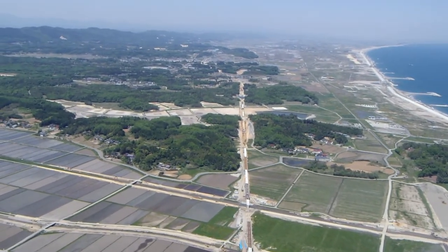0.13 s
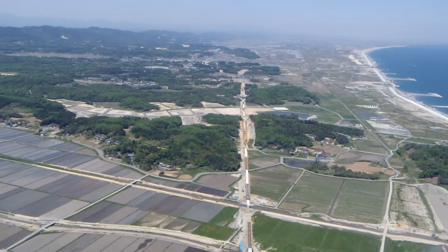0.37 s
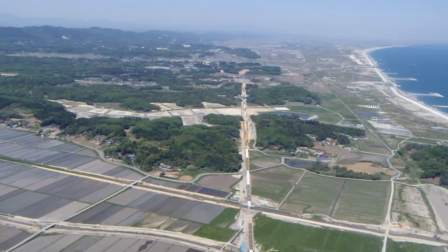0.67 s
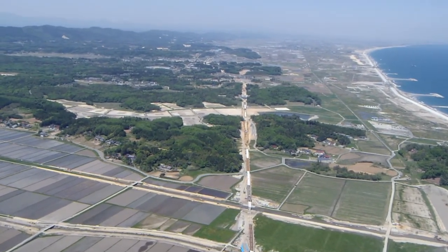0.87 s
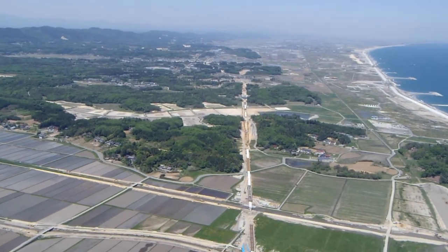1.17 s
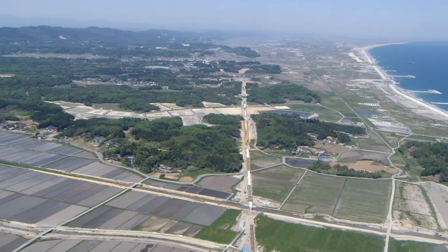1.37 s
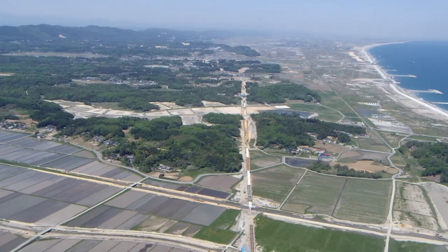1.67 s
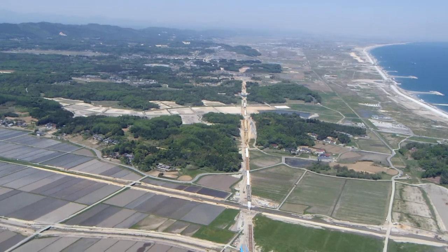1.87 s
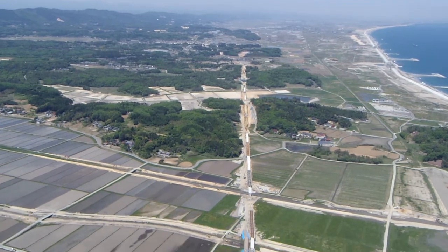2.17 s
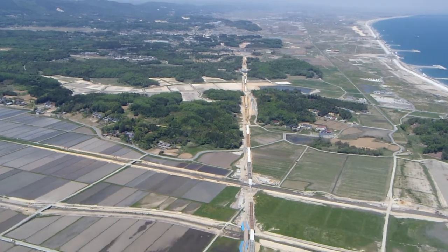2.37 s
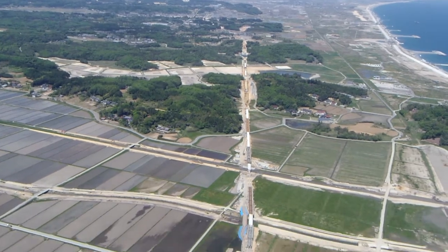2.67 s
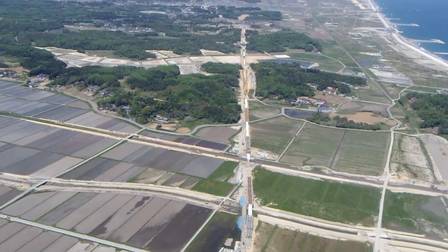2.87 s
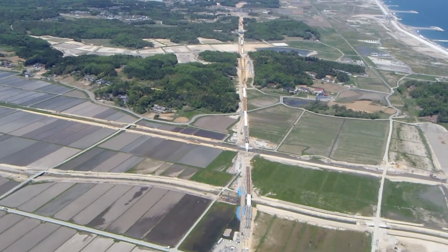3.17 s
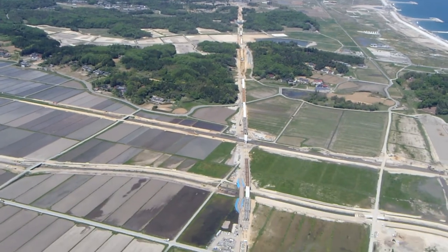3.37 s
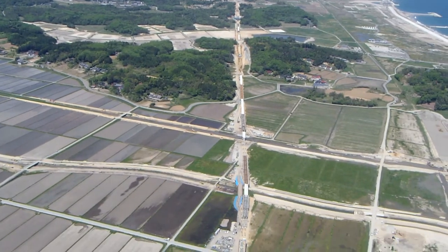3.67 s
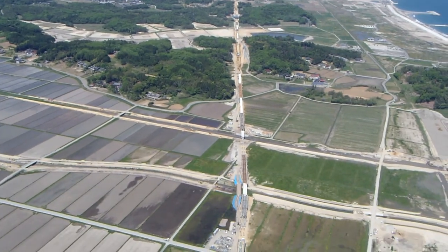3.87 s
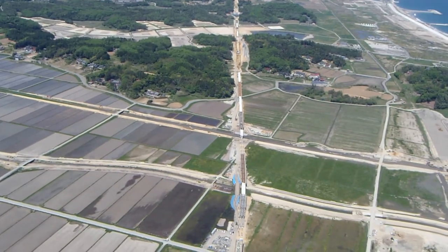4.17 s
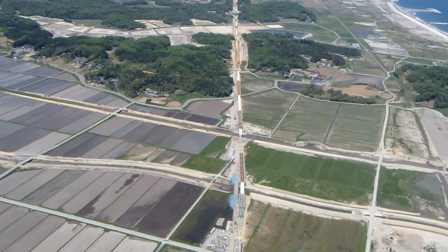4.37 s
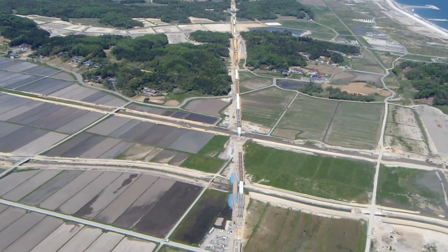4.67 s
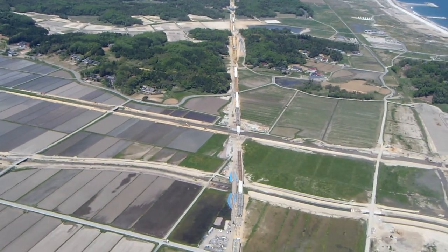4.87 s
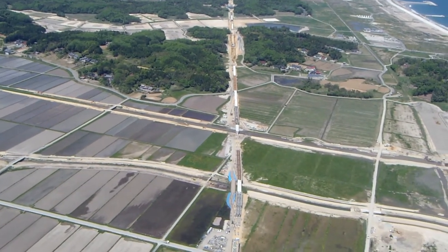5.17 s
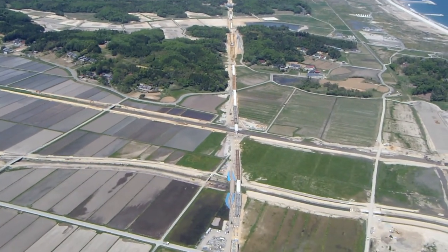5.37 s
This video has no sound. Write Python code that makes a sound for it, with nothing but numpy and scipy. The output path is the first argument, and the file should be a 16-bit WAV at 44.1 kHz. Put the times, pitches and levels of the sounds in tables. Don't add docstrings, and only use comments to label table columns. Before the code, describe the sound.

In flight above farmland, a paramotor engine and propeller behind the pilot hold a steady, raspy drone: blade beats near 70 a second, sagging very slightly, interlocked with faster exhaust firing near 120 a second and a faint drive whine. Broad mid roar and airy hiss throb with each blade. Wind hits two exposed camera microphones independently, with deep thuds, dense crackle and overloaded distortion. The left side is softer at first, though a low hollow moan swells there around 0.3-1.0 s and returns higher near 2.1 s; the right moans from 1.4 s, loudest near 2.75 s, leaping higher around 3.15 s. Sharp snaps, mainly right, cluster from 1.2 to 2.9 s. At about 3 s the camera tilts down and the buffeting falls away, leaving drone and roar with light flutter and isolated snaps near 4.3 and 4.6 s. Tiny lens whines around 7 kHz surface briefly, notably at 0-0.3, 3.1-3.5 and 4.9-5.3 s. It ends at 5.5 s, still droning.

```python
import sys
import numpy as np
from scipy import signal
from scipy.fft import rfft, irfft, next_fast_len
from scipy.io import wavfile
from scipy.ndimage import uniform_filter1d

SR = 44100
rng = np.random.default_rng(int(sys.argv[2]) if len(sys.argv) > 2 else 0)


def decibels_to_gain(level_db):
    exponent = np.asarray(level_db, float) / 20
    return 10 ** exponent


def transcribe(signal):
    frames = np.atleast_2d(signal).T
    limited = np.clip(frames, -1, 1)
    pcm = np.round(limited * 32767).astype(np.int16)
    wavfile.write(sys.argv[1], SR, pcm)


N = 243431
TIME = np.arange(N) / SR
PORT_LAG = 4.3


def curve(table):
    s, *columns = np.transpose(table)
    return [np.interp(TIME, s, c) for c in columns]


def colour(x, spectrum, lag=0.):
    hz, db = np.transpose(spectrum)
    size = next_fast_len(N)
    f = np.arange(size // 2 + 1) * SR / size + 1e-3
    gain = decibels_to_gain(np.interp(np.log(f), np.log(hz), db))
    delay = np.exp(-2j * np.pi * f * lag / SR)
    y = irfft(rfft(x, size) * gain * delay, size)[:N]
    return y / np.sqrt(np.mean(y ** 2))


def walk(rate):
    hold = int(SR / rate)
    levels = np.repeat(rng.standard_normal(N // hold + 1), hold)
    return 1.39 * uniform_filter1d(uniform_filter1d(levels, hold), hold)[:N]


def ports(source, spectrum, likeness):
    like = np.clip(likeness, 0, 1)
    shared = source()
    heard = []
    for lag in (PORT_LAG, 0.):
        common = np.sqrt(like) * colour(shared, spectrum, lag)
        own = np.sqrt(1 - like) * colour(source(), spectrum)
        heard.append(common + own)
    return np.array(heard)


def blade_phase():
    # t/s, f/Hz
    blade_rate = [(0.11, 70), (0.5, 70.15), (1.0, 70.14), (1.5, 69.6), (2.0, 69.49), (2.5, 69.35),
                  (3.5, 69.1), (4.0, 69.35), (5.0, 69.38), (5.41, 69.12)]
    blade_hz, = curve(blade_rate)
    return 2 * np.pi * np.cumsum(blade_hz) / SR + 0.028 * walk(25)


def comb(phase, orders, flutter_db):
    out = np.zeros((2, N))
    for k, left_db, right_db in orders:
        start = max(k - 6.5, 0) + (k > 12) * .8 * rng.standard_normal()
        flutter = decibels_to_gain(flutter_db * walk(12))
        late = np.array([[PORT_LAG / SR * 2 * np.pi * k * 70], [0]])
        level = np.sqrt(2) * decibels_to_gain([[left_db], [right_db]])
        out += level * flutter * np.cos(k * phase + start - late)
    return out


def engine(phase):
    # multiple of blade rate, left level/dB, right level/dB
    blade = [(1, -38, -34), (2, -34, -30), (3, -27, -27), (4, -26, -25), (5, -33, -37), (6, -30, -29),
             (7, -38, -37), (8, -29, -33), (9, -30, -27), (10, -39, -38), (11, -32, -31), (12, -44, -40),
             (13, -40, -50), (14, -40, -38), (15, -44, -47), (16, -41, -39), (17, -42, -42), (18, -52, -47),
             (19, -45, -42), (20, -43, -46), (21, -49, -53), (22, -58, -47), (23, -59, -57), (24, -48, -57),
             (25, -55, -52), (26, -56, -56), (27, -53, -50), (28, -61, -63)]
    # multiple of blade rate, left level/dB, right level/dB
    drive = [(26.5, -50, -50), (27.5, -56, -56), (28.5, -51, -51)]
    # multiple of firing rate, left level/dB, right level/dB
    firing = [(1, -32, -37), (2, -30, -29), (3, -34, -34), (4, -48, -41), (5, -46, -45), (6, -49, -47),
              (7, -45, -46), (8, -48, -49), (9, -44, -44), (10, -48, -48), (11, -56, -48), (12, -58, -55)]
    firings_per_blade = 1.719
    beats = decibels_to_gain(-0.03) * comb(phase, [*blade, *drive], .8)
    return beats + decibels_to_gain(-1.7) * comb(firings_per_blade * phase, firing, 1.3)


def slipstream(phase):
    # f/Hz, level/dB per Hz
    roar_spectrum = [(40, -30), (100, -33), (250, -1.5), (450, -6), (800, -13), (1300, -16), (1700, -23.5),
                     (2400, -21.5), (3200, -30), (4500, -36), (6500, -58), (9000, -58), (14000, -92)]
    # f/Hz, level/dB per Hz
    hiss_spectrum = [(2500, -24), (4500, 0), (6500, -4), (8500, -4.5), (10000, -2.5), (11200, -1.5),
                     (12800, -6), (15500, -11)]

    def roar_air():
        return rng.standard_normal(N) * decibels_to_gain(0.33 * np.cos(phase) + 2.93 * walk(200))

    roar = ports(roar_air, roar_spectrum, 0.59)
    throb = decibels_to_gain(1.8 * np.cos(phase - 2.6) + 1.0 * walk(200))
    hiss = ports(lambda: rng.standard_normal(N) * throb, hiss_spectrum, 0.21)
    roar_db = -24 + np.array([[-.7], [.7]])
    hiss_db = -47 + np.array([[-.4], [.4]])
    return decibels_to_gain(roar_db) * roar + decibels_to_gain(hiss_db) * hiss


def steepen(x, lead):
    place = np.arange(N)
    return np.array([np.interp(place + lead * port, place, port) for port in x])


def snap(push, rise_hz, fall_hz):
    rise = signal.butter(3, rise_hz, fs=SR, output="sos")
    fall = signal.butter(1, fall_hz, "high", fs=SR, output="sos")
    return signal.sosfilt(np.vstack([rise, fall]), np.cumsum(push, axis=1))


def buffet():
    # t/s, buffet level/dB, left minus right level/dB
    wind_track = [(0.0, -17.5, -4), (0.2, -19.5, -4), (0.6, -18, -1.5), (1.0, -18.5, -4.5),
                  (1.4, -16.5, -8.5), (1.8, -15.5, -7), (2.4, -16.5, -7.5), (2.88, -17, -10.5),
                  (3.0, -22, -5.5), (3.15, -20.5, -5.5), (3.4, -23.5, -2), (3.6, -22, -2),
                  (4.3, -24.5, -0.5), (4.8, -25.5, 1.5), (5.15, -24, -1), (5.52, -24.5, -3)]
    # f/Hz, level/dB per Hz
    eddy_spectrum = [(40, -64), (80, -3), (120, -2), (160, -1), (220, -4.5), (400, -12.5), (900, -20.5),
                     (1800, -29), (3000, -43.5), (6000, -66), (12000, -100)]
    # f/Hz, level/dB per Hz
    thud_spectrum = [(8, -40), (20, -12), (40, -4), (65, 2), (100, -7), (200, -56), (800, -80)]
    level_db, pan_db = curve(wind_track)
    pan_db = np.array([pan_db, -pan_db]) / 2

    eddies = np.array([colour(rng.standard_normal(N) * decibels_to_gain(1.4 * walk(150)), eddy_spectrum) for _ in range(2)])
    eddies = eddies + 0.19 * (eddies ** 2 - 1)

    thuds = np.array([colour(rng.standard_normal(N), thud_spectrum) for _ in range(2)])
    thud_db = np.minimum(-26.5 + 1.34 * (level_db + 20.5) + walk(9), -20.5)

    chance = rng.random((2, 2, N))
    step_db = np.minimum(-3.5 * np.log(chance[1] + 1e-9), 11.)
    steps = (chance[0] < 160 / SR) * decibels_to_gain(step_db)
    crackle_db = -51 + .7 * (level_db + 19.5) + 1.5 * walk(14)
    crackle = decibels_to_gain(crackle_db + pan_db + 24) * snap(steps, 2930.0, 430.0)

    wind = decibels_to_gain(level_db + pan_db + 3.5) * eddies
    wind = wind + decibels_to_gain(thud_db + 0.31 * pan_db + 1.5) * thuds + moan()
    return steepen(wind, 9.) + crackle


def lens_motor():
    # start t/s, end t/s, f/Hz, level/dB
    whine = [(.02, .11, 7320, -62), (.11, .27, 7354, -60), (.71, .83, 7510, -66), (1.51, 1.62, 7350, -61),
             (2.24, 2.37, 7330, -59), (2.43, 2.5, 7530, -66), (3.07, 3.14, 7460, -61),
             (3.14, 3.37, 7420, -59), (3.37, 3.46, 7500, -61), (4.86, 4.99, 7255, -61),
             (4.99, 5.33, 7214, -61), (3.1, 3.37, 15620, -70), (4.99, 5.33, 13620, -69)]
    out = np.zeros(N)
    for start, end, hz, db in whine:
        gate = np.clip(np.minimum(TIME - start, end - TIME) / .006, 0, 1)
        level = np.sqrt(2) * decibels_to_gain(db) * gate * decibels_to_gain(1.4 * walk(45))
        out += level * np.sin(2 * np.pi * hz * TIME + 0.47 * walk(60))
    return out * decibels_to_gain([[0.5], [-0.5]])


def snaps():
    # t/s, step level/dB, bright ring level/dB
    left_snaps = [
        (.7054, -3, -36),
        (1.9325, -10, -36),
        (1.991, -10, -40),
        (2.0125, -9, -36),
        (2.0954, -7, -26),
        (2.494, -9, -30),
        (2.6653, -8, -36),
        (4.3032, -9, -38),
    ]
    # t/s, step level/dB, bright ring level/dB
    right_snaps = [(.0272, -6, -28), (.0847, -8, -26), (.3868, -9, -30), (.8471, -5, -25),
                   (1.0213, -9, -27), (1.1715, -8, -40), (1.2499, -6, -16), (1.2676, -8, -30),
                   (1.3061, -12, -28), (1.4577, 1, -36), (1.6874, -7, -33), (1.7435, -8, -29),
                   (1.8535, -4, -16), (1.9247, -7, -32), (2.0339, -9, -30), (2.3863, -5, -27),
                   (2.4075, -7, -40), (2.4795, -7, -32), (2.5056, -4, -40), (2.5189, -9, -36),
                   (2.5661, -9, -26), (2.6003, -8, -36), (2.6772, -6, -31), (2.6983, -6, -22),
                   (2.7764, -9, -30), (2.835, -7, -28), (2.8937, -6, -29), (2.9036, -7, -29),
                   (2.9356, -6, -27), (4.6213, -11, -26)]
    push, ring = np.zeros((2, 2, N))
    cycles = 5000 * np.arange(90) / SR
    shape = cycles * np.exp(-cycles / 1.2) * np.sin(2 * np.pi * cycles)
    for port, table in enumerate((left_snaps, right_snaps)):
        for s, db, ring_db in table:
            at = int(s * SR) - 10
            push[port, at] = decibels_to_gain(db)
            ring[port, at:at + 90] += decibels_to_gain(ring_db) * shape
    dulling = signal.butter(2, 6000, fs=SR, output="sos")
    return signal.sosfilt(dulling, decibels_to_gain(4) * ring - decibels_to_gain(7) * snap(push, 3000., 1100.))


def moan():
    # t/s, shedding f/Hz, level/dB
    left_moan = [
        (.1, 135, -29),
        (.3, 120, -15),
        (.55, 140, -13.5),
        (.75, 118, -11.5),
        (1.1, 133, -17),
        (1.5, 155, -28),
        (2.1, 168, -16.5),
        (2.5, 205, -21),
        (2.8, 210, -45),
    ]
    # t/s, shedding f/Hz, level/dB
    right_moan = [
        (1.2, 140, -40),
        (1.5, 119.7, -17),
        (1.699, 127.7, -17),
        (2., 158.2, -22),
        (2.15, 115.6, -21),
        (2.5, 158.1, -18),
        (2.751, 139.9, -12),
        (2.92, 155, -20),
        (3.151, 212.7, -14.5),
        (3.35, 213.9, -45),
    ]
    width_hz = 45
    out = []
    for hz, db in map(curve, (left_moan, right_moan)):
        unsteady = 0.32 + walk(width_hz) + 1j * walk(width_hz)
        shedding = np.exp(2j * np.pi * np.cumsum(hz) / SR)
        out.append(decibels_to_gain(db) * np.real(unsteady * shedding))
    return np.array(out)


def scene():
    phase = blade_phase()
    return engine(phase) + slipstream(phase) + buffet() + lens_motor() + snaps()


def low_pass(x):
    return signal.sosfilt(signal.butter(12, 15650, fs=SR, output="sos"), x)


def record(dry):
    dry = signal.sosfilt(signal.butter(1, 12, "high", fs=SR, output="sos"), dry)
    rounded = 1.22 * np.tanh(dry / 1.12)
    return low_pass(np.clip(rounded, -1, 1))


dry = scene()
out = record(dry)
transcribe(out)
```